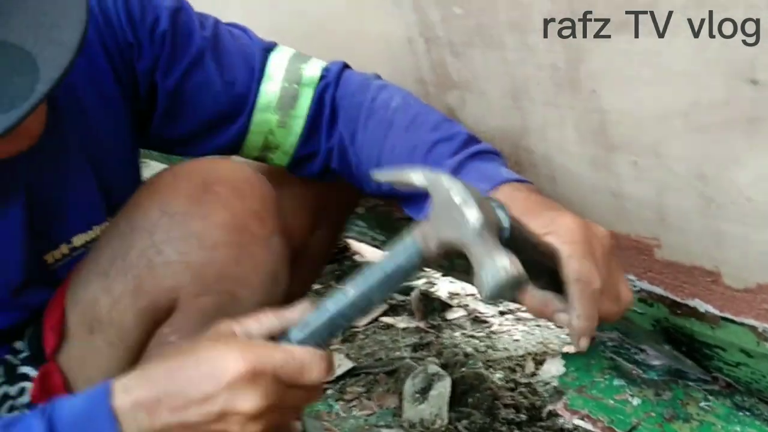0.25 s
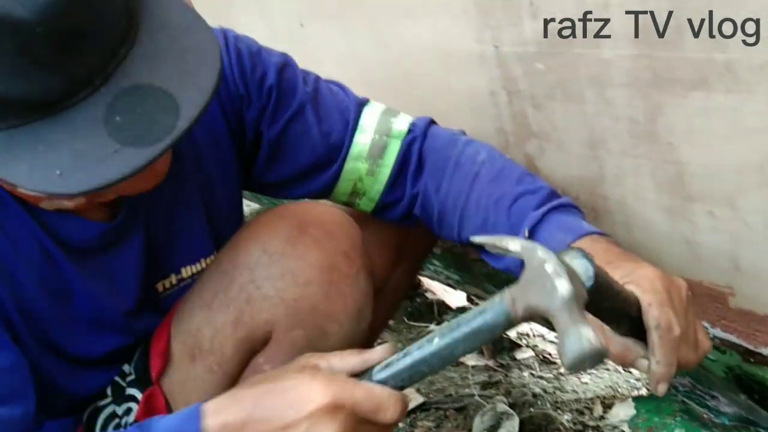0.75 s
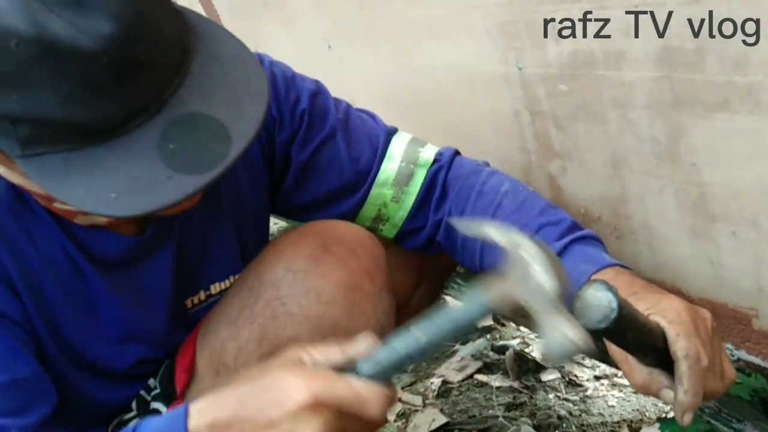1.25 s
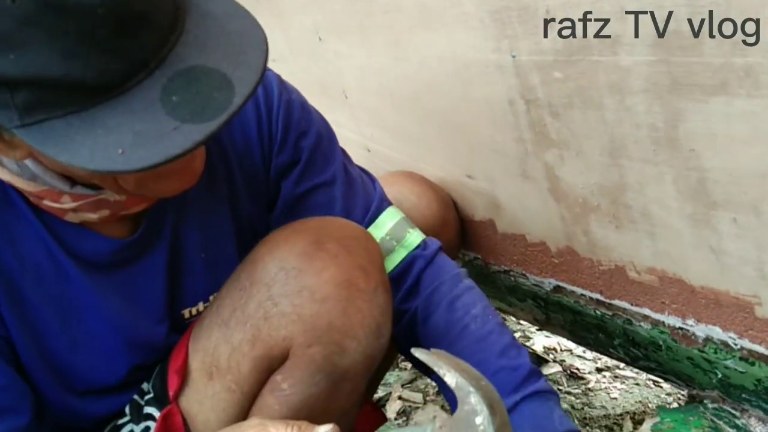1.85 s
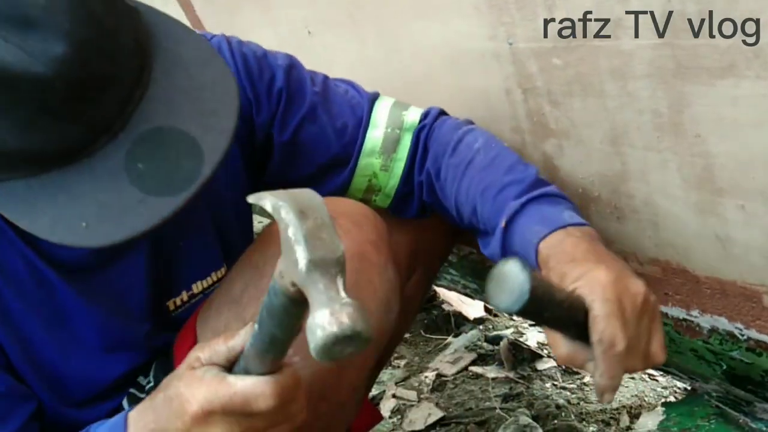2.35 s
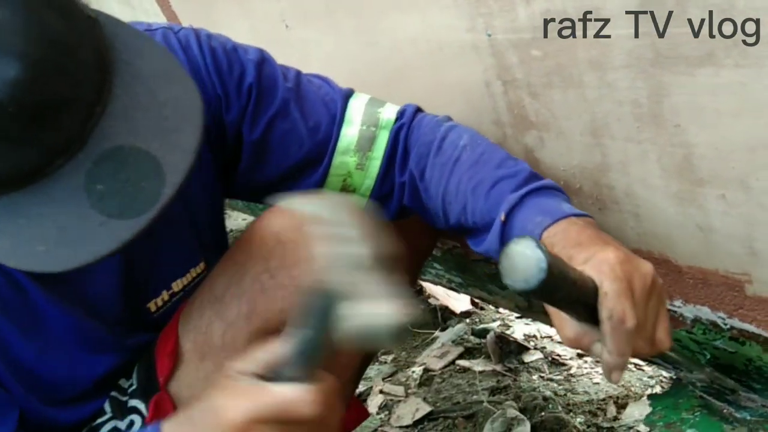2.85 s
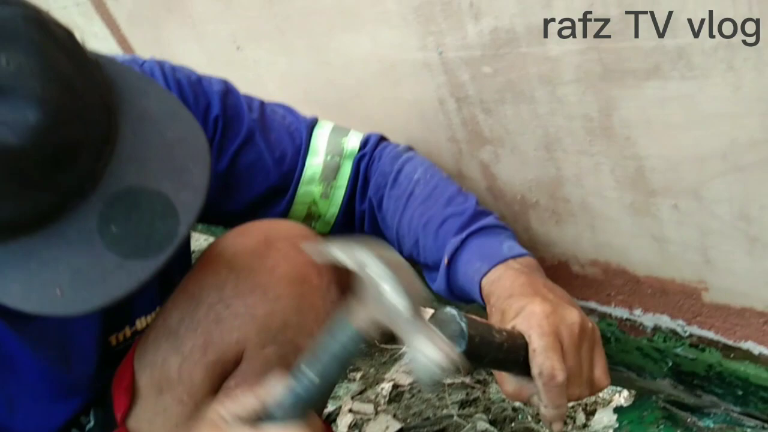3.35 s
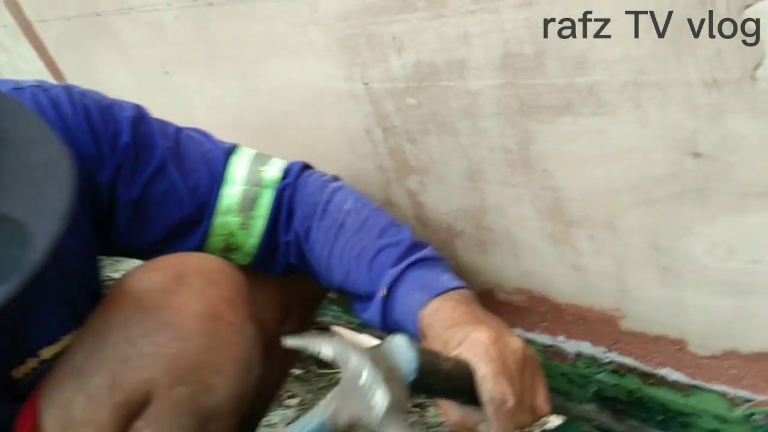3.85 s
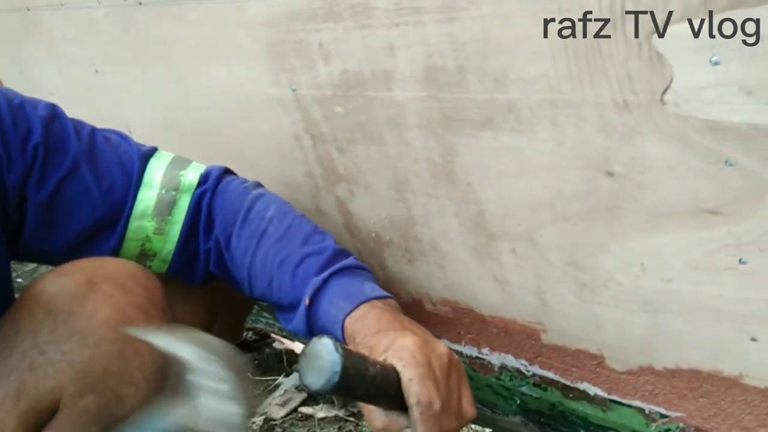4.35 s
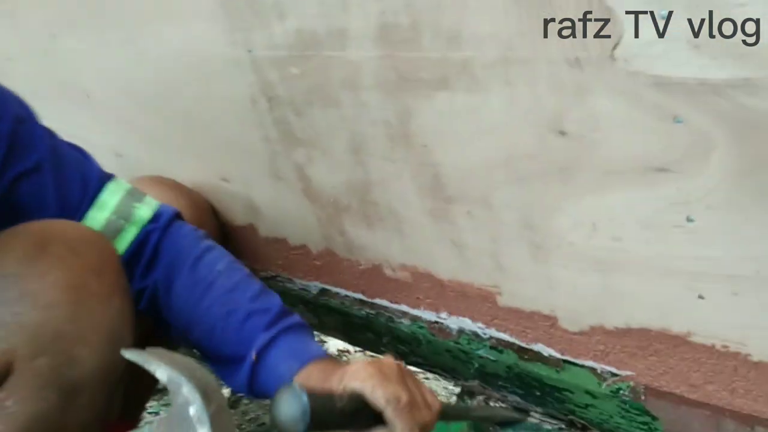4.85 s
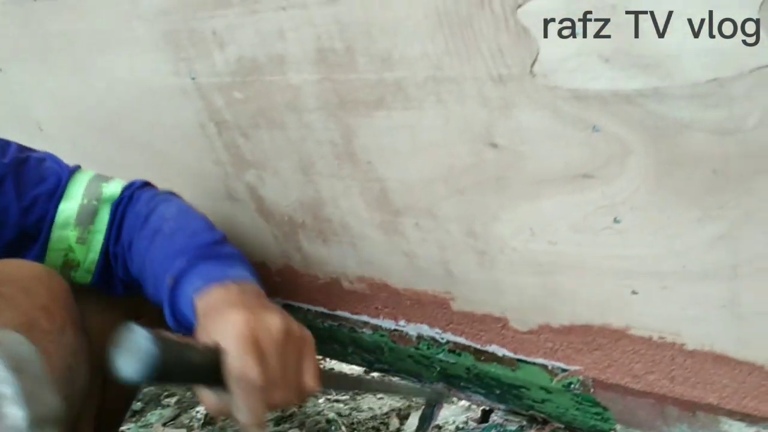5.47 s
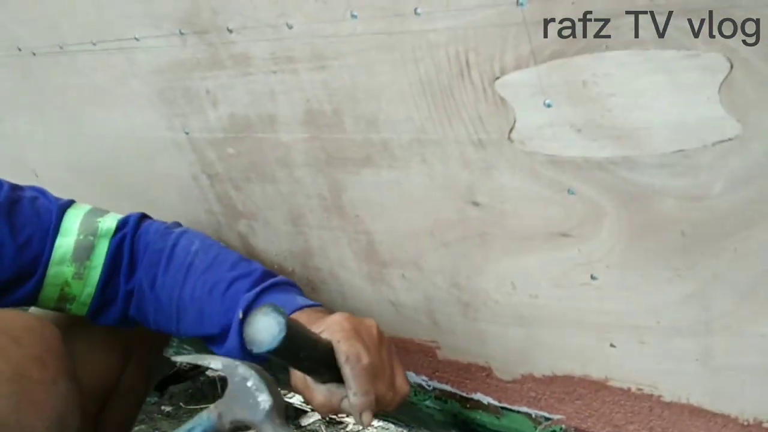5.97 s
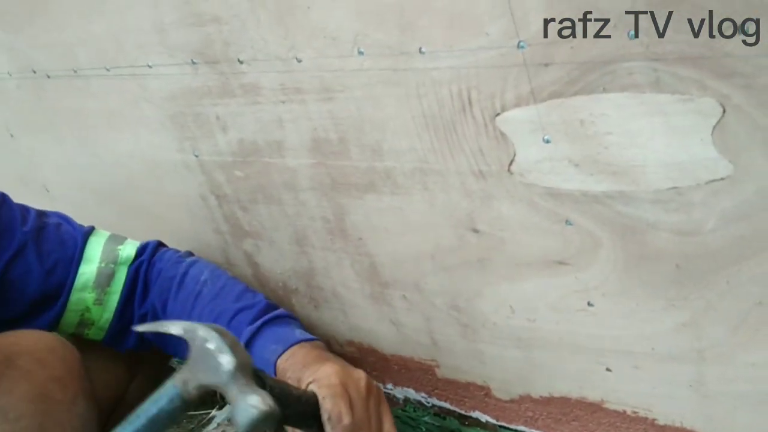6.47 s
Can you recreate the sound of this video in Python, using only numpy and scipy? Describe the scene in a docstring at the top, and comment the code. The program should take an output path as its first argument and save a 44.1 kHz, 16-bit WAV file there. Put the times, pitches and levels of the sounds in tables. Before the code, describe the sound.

A hammer taps a steel chisel up close while heavier blows boom on wooden planking farther off, over a faint outdoor hiss.

```python
"""An open yard near the surf, one microphone close to a wooden hull. A hammer drives a steel chisel
along a seam: dry bright taps, and small ticks where steel touches steel or grit. Heavier blows land on
the planking farther off: a murmur runs ahead through the wood, then crack and boom arrive by air.
In the distance a rooster ends its crow; a faint whine comes and goes over the hiss of surf and yard.
A limiter holds the peaks."""
import sys
import numpy as np
from scipy import signal
from scipy.io import wavfile
from scipy.ndimage import uniform_filter1d, minimum_filter1d

SR = 44100
rng = np.random.default_rng(int(sys.argv[2]) if len(sys.argv) > 2 else 0)


def store_pcm(level_fs):
    """Save levels as 16-bit WAV."""
    pcm = np.round(np.clip(level_fs, -1, 1) * 32767).astype(np.int16)
    wavfile.write(sys.argv[1], SR, np.atleast_2d(pcm).T)


N = 296117

# taps and rebounds: start_s, level_db, bass_db, middle_db, treble_db, length_factor, ring_db, flake_hz
TAPS = [(0.3393, 3, -3, -4.5, 6, 0.78, -8, 1386), (0.621, -5.5, -13, 1.5, -4, 2.54, -2, 2750),
        (1.1661, 0, 2.5, -2.5, 5.5, 0.85, -1, 1480), (1.193, -10.5, 3, -4, -9, 1.1, -3.5, 1560),
        (1.527, 5, -8.5, -4.5, -10, 0.93, -8.5, 2063), (2.985, -5, 9.5, -1, 3.5, 1.35, -8, 3620),
        (3.475, -6.5, 14.5, -2, 4.5, 0.96, -4, 1020), (3.8991, 0, 3.5, -4.3, 10.5, 1.06, -7, 2010),
        (4.2898, 3, 1, -3.5, 11.5, 0.77, -0.5, 1970), (4.684, -9, 11, 4.5, 11, 1.3, 6, 1473),
        (4.731, -10.5, -10, -7, -0.5, 1.1, 0, 4130), (6.003, -10, 11, -1.5, 4, 1.22, -4, 880),
        (6.034, -28.5, -5, -3, 3, 0.42, 3.5, 1040), (6.4593, -5.5, 7.5, 2.5, 3.5, 0.99, -1.5, 1413),
        (6.483, -21.5, 8, -6, -15, 0.54, 4.5, 2740)]
# spectrum of a tap: frequency_hz, density_db
TAP_SPECTRUM = [(35, -12), (60, -20), (497, -3.5), (938, 1), (1570, -4.5), (1850, 46), (2040, -14),
                (2290, -7), (3040, 4), (4630, -11), (5340, 2.5), (8140, -26), (15000, -48.5),
                (16500, -31.5)]
# decay of a tap at length factor 1: frequency_hz, t60_s
TAP_DECAY = [(100, 0.27), (400, 0.15), (1100, 0.097), (3000, 0.12), (7000, 0.11), (14000, 0.034)]
# modes of putty, seam and gripped chisel: pitch_hz, level_db, t60_s
SEAM_MODES = [(937, -1.5, 0.082), (1390, 9.5, 0.011), (2038, -8, 0.091), (3040, -6, 0.021),
              (3650, 9, 0.0048), (5850, 16.5, 0.0053)]
# modes of the short pitched note in a tap or tick: pitch_ratio, level_db, t60_s
SHORT_MODES = [(1.002, 13, 0.022), (1.43, -12, 0.0099)]


def chisel_taps(bands):
    """Close up, hammer on chisel: putty and wood crack while the seam and a struck flake ring."""
    hits, seam, flakes = [], [], []
    for start_s, level_db, bass_db, middle_db, treble_db, length, ring_db, flake_hz in TAPS:
        tail_db = -4
        hits.append((start_s, level_db - 11, bass_db, middle_db, treble_db, tail_db, length))
        mode_db = level_db + ring_db - 11.5
        seam.append((start_s, mode_db, 1))
        flakes.append((start_s, mode_db, flake_hz))
    cracks = impacts(bands, hits, TAP_SPECTRUM, TAP_DECAY, crack_s=0.0071, contact_s=0.00055,
                     rise_cycles=0.35, uneven_db=2.67, crunch_db=2.5,
                     echo_db=-35.5, echo_t60_s=0.3, duration_s=0.35)
    return (cracks + ring(seam, SEAM_MODES, spread_db=3.5, detune=0.015)
            + ring(flakes, SHORT_MODES, spread_db=3, detune=0.0056))


# light touches at the chisel: start_s, level_db, bass_db, tail_db, ring_db, clink_hz
TICKS = [(1.6283, -23, -7, -22, -6, 5630), (1.647, -14, -11, -18, -2, 5430),
         (1.6927, -17.5, -5, -10, -7, 6200), (1.7423, -37, -6, -21, 8, 5600),
         (1.7612, -12, -10, -13, 0, 5500), (3.2583, -17.5, 0, -15, -20, 2370),
         (3.269, -17.5, -18, -27, -23, 3220), (3.348, -25, -21, -17.5, -14, 3140),
         (4.8189, -35, 3, -15, -6, 1620), (4.9023, -33, -6, -12, -4, 5270), (4.9115, -21, -6, -24, 1, 5440),
         (4.933, -14, -4.5, -7, -9, 5360), (4.9607, -20.5, 2, -6, -1, 5350), (4.976, -17, 7, -20, 3, 5430),
         (4.9885, -27, 14, -8, -2, 5310), (5.0086, -18, 13, -11, 4, 5260), (5.0198, -14, 4, -7, -5, 5180),
         (5.0329, -14.5, 5, -9, -16, 5230), (5.043, -15, 19, -12, -8, 5200), (5.218, -39, -3, -2, 9, 6720),
         (5.24, -34.5, 22, -3.5, 1, 5370), (5.266, -31, 7, -0.5, -13, 1910),
         (5.3043, -26, 14, -1, -9, 5200), (5.4527, -36.5, -15, -17, -15, 5950),
         (5.7865, -24.5, 29, -6, -11, 970), (5.832, -34.5, 1, 2.5, 7, 6600),
         (5.871, -20.5, 8, -3.5, -20, 1330), (5.89, -22, 7, -16, -6, 5150)]
# spectrum of a tick: frequency_hz, density_db
TICK_SPECTRUM = [(180, -4.5), (300, -2.5), (1290, -0.5), (1740, -6.5), (2100, -5.5), (4610, -12),
                 (5360, -7), (7010, -7.5), (8430, -37.5), (14900, -32.5), (16500, -35)]
# decay of a tick at length factor 1: frequency_hz, t60_s
TICK_DECAY = [(500, 0.048), (5000, 0.1), (12000, 0.13)]
# modes of the loosely held chisel: pitch_hz, level_db, t60_s
STEEL_MODES = [(5270, -6, .06), (6850, -4, .08), (8590, -24, .14), (10450, -33, .14), (12600, -40, .1),
               (14200, -34, .1)]


def steel_ticks(bands, lifted_s=5.15):
    """Close up, light touches click and clink; the chisel is muted in the seam and rings once lifted."""
    hits, steel, clinks = [], [], []
    for start_s, level_db, bass_db, tail_db, ring_db, clink_hz in TICKS:
        middle_db, treble_db = 6.5 - 0.64 * bass_db, 4.5   # a duller touch has less middle
        length = 1.219 - 0.0371 * bass_db   # and a shorter tail
        hits.append((start_s, level_db - 11.5, bass_db, middle_db, treble_db, tail_db, length))
        hold_db = -8 if start_s > lifted_s else -18.5
        steel.append((start_s, level_db + ring_db + hold_db, 1))
        clinks.append((start_s, level_db - 19, clink_hz))   # mostly the steel chisel's own note
    clicks = impacts(bands, hits, TICK_SPECTRUM, TICK_DECAY, crack_s=0.0019, contact_s=0.00032,
                     rise_cycles=0.6, uneven_db=1.6, crunch_db=-1,
                     echo_db=-40, echo_t60_s=0.3, duration_s=0.15)
    return (clicks + ring(steel, STEEL_MODES, spread_db=3, detune=0.006)
            + ring(clinks, SHORT_MODES, spread_db=2.5, detune=0.02))


# blows on the planking: start_s, level_db, bass_db, bright_db, length_factor, knock_db, plank_hz, lead_s
BLOWS = [(0.043, -3, 4.7, -2, 0.95, -4, 209.6, 0.016), (0.23, -9, 3.5, 9, 0.77, 8.5, 157, 0.013),
         (0.248, -16.5, 1, 8.5, 0.45, 19.5, 170.8, 0.0061), (0.263, -16.5, 8.5, -1, 1.2, 13, 164, 0.0079),
         (0.546, -1, 2.5, -4, 1.42, 2, 217, 0.012), (0.754, -2.5, 1, 0, 0.42, -1.5, 306, 0.017),
         (0.768, -5.5, 0, -1, 0.86, 8, 162.5, 0.031), (1.003, -7.5, 0.5, 4.5, 1.08, 6.5, 164.5, .014),
         (1.272, -5.5, 7.2, 1.5, 1.17, 2.3, 311.4, 0.031), (1.388, -1, -15, 0.5, 1.03, -0.5, 159, 0.0076),
         (1.779, -5.5, -7.5, 5.5, 1.09, 2, 165.7, 0.012), (2.179, -6.5, -3.5, 6, 1.13, 5, 161.7, 0.013),
         (2.594, -7.5, 3.5, 5, 1.26, 11, 158.3, 0.014), (3.027, -14.5, 9.5, 11.5, 1.26, 14, 164, 0.0077),
         (3.771, -20.5, -14.5, -13, 2.4, 0.5, 137, 0.0058), (4.077, 0, -2.5, -4.5, 1.01, -4, 203, 0.011),
         (4.698, -9, 3.5, -4.5, 1.08, -5.5, 264, .015), (5.572, 4.5, -2.5, -5, 0.83, -8.5, 210.7, 0.012),
         (6.114, -2, 3.5, 0.9, 1.017, 0, 204.6, .012), (6.601, -0.5, 2.8, -0.5, 1.03, -1, 211, .014)]
# spectrum of a blow: frequency_hz, density_db
BLOW_SPECTRUM = [(24, -40), (40, -29), (81, -3), (258, 2), (324, -4.5), (438, -1), (865, -8.5), (1030, -5),
                 (1260, -11.5), (1710, -8), (5720, -8.5), (6820, -10), (8560, -40.5), (14900, -44.5),
                 (16500, -77)]
# decay of a blow at length factor 1: frequency_hz, t60_s
BLOW_DECAY = [(60, 0.57), (160, 0.34), (420, 0.3), (1100, 0.23), (3000, 0.16), (7000, 0.17), (14000, 0.11)]
# drum modes of a plank: pitch_ratio, level_db, t60_s
PLANK_MODES = [(.63, -13.5, 0.27), (1.002, 6, 0.066), (1.401, -3.5, 0.056), (1.848, -5.5, 0.08),
               (2.7, -14.5, 0.14), (3.601, -17, 0.26)]


def plank_blows(bands):
    """Farther along the hull, heavy blows crack and boom, and the plank rings like a drum."""
    hits, knocks = [], []
    for start_s, level_db, bass_db, bright_db, length, knock_db, plank_hz, _ in BLOWS:
        treble_db, tail_db = 0.99 * bright_db - 3, -3
        hits.append((start_s, level_db - 8, bass_db, bright_db, treble_db, tail_db, length))
        knocks.append((start_s, level_db + knock_db - 9.5, plank_hz))
    booms = impacts(bands, hits, BLOW_SPECTRUM, BLOW_DECAY, crack_s=0.0059, contact_s=0.0013,
                    rise_cycles=0.17, uneven_db=2.5, crunch_db=2,
                    echo_db=-31.5, echo_t60_s=0.86, duration_s=0.55)
    return booms + ring(knocks, PLANK_MODES, spread_db=2, detune=0.012)


def hull_murmur(bands, low_hz=460, high_hz=1060):
    """Sound is faster in wood than in air: a murmur reaches the microphone ahead of each far blow."""
    humps = np.exp(-np.log2(BAND_HZ / low_hz) ** 2) + np.exp(-np.log2(BAND_HZ / high_hz) ** 2)
    murmur = humps @ bands
    t, swell = np.arange(N) / SR, np.zeros(N)
    for start_s, level_db, *_, knock_db, _, lead_s in BLOWS:
        corners_s = start_s + lead_s * np.array([-1, -0.5, 0, 0.5])
        swell += amp(level_db + knock_db - 25.5) * np.interp(t, corners_s, [0, 0.65, 0.92, 0])
    return swell * murmur / murmur.std()


# the end of the crow: time_s, pitch_hz, level_db
CROW = [(0.091, 604, -70), (0.141, 622, -43.5), (0.299, 646, -40), (.42, 656, -45.5), (.49, 651, -39),
        (0.534, 630, -48), (0.561, 590, -62)]
# partials that reach the microphone: harmonic_number, level_db
CROW_PARTIALS = {2: 0, 4: -17, 7: -10, 8: -12, 9: -10}


def rooster(swell_db_per_hz=1):
    """A rooster far off: only a few partials carry, swelling as the pitch wavers up."""
    time_s, pitch_hz, level_db = np.transpose(CROW)
    t = np.arange(N) / SR
    waver_hz = 87 * uniform_filter1d(rng.standard_normal(N), size=800)
    phase = 2 * np.pi * np.cumsum(np.interp(t, time_s, pitch_hz) + waver_hz) / SR
    voice = sum(amp(db) * np.sin(harmonic * phase) for harmonic, db in CROW_PARTIALS.items())
    return amp(np.interp(t, time_s, level_db, right=-200) + waver_hz * swell_db_per_hz) * voice


def whine(pitch_hz=5500, level_db=-50, start_s=0.94, end_s=1.62, fade_s=0.042):
    """A faint steady whine, perhaps an insect: noise in one narrow resonance."""
    resonance = signal.butter(2, [pitch_hz - 40, pitch_hz + 40], "band", fs=SR, output="sos")
    tone = signal.sosfilt(resonance, rng.standard_normal(N))
    fade = np.interp(np.arange(N) / SR, [start_s, start_s + fade_s, end_s - fade_s, end_s], [0, 1, 1, 0])
    return amp(level_db) * fade ** 2 * tone / tone.std()


# drift of the distant hiss: time_s, level_db
HISS_LEVELS = [(0.0, -39.5), (0.75, -54), (1.08, -46), (1.4, -50), (2.7, -43), (3.61, -47), (4.22, -46),
               (4.37, -54), (4.73, -51.5), (4.97, -46.5), (5.42, -50), (5.94, -52), (6.71, -48)]
# spectrum of surf and yard: frequency_hz, density_db
YARD_SPECTRUM = [(15, -52), (25, 2), (74, 7.5), (124, 11.5), (288, -8), (339, 0.5), (378, -4), (600, -10.5),
                 (1060, -7.5), (4480, -13), (5870, -5), (8820, -46.5), (11300, -32.5), (15200, -70),
                 (16500, -27)]


def surf_and_yard(bands, rumble_db=-51):
    """Distant surf and yard noise: a smooth drifting hiss over a steady rumble."""
    time_s, level_db = np.transpose(HISS_LEVELS)
    gains = band_gains(YARD_SPECTRUM)
    low = BAND_HZ < 300
    hiss = gains[~low] @ bands[~low, ::-1]   # reversed noise is unrelated to the blows
    rumble = gains[low] @ bands[low, ::-1]
    return amp(np.interp(np.arange(N) / SR, time_s, level_db)) * hiss + amp(rumble_db) * rumble


EDGES_HZ = 28 * 2 ** np.arange(0, 9.4, 1 / 3)
BAND_HZ = np.sqrt(EDGES_HZ[1:] * EDGES_HZ[:-1])


def noise_bands():
    """Third-octave bands of white noise, neighbours unrelated."""
    settle = 8000   # samples for the filters to settle
    white = rng.standard_normal((2, N + settle))
    filters = [signal.butter(3, edges, "band", fs=SR, output="sos")
               for edges in zip(EDGES_HZ, EDGES_HZ[1:])]
    return np.array([signal.sosfilt(sos, white[k % 2])[settle:] for k, sos in enumerate(filters)])


def impacts(bands, hits, spectrum, decay, crack_s, contact_s, rise_cycles, uneven_db, crunch_db,
            echo_db, echo_t60_s, duration_s):
    """Each hit is a short crack, a lumpy tail dying band by band and a faint return from the yard."""
    out, t = np.zeros(N), np.arange(int(duration_s * SR)) / SR
    hz = BAND_HZ[:, None]
    bass = 1 / (1 + (hz / 725) ** 2)
    middle = np.exp(-np.log2(hz / 2800) ** 2 / 0.87)
    treble = 1 / (1 + (4070 / hz) ** 4)
    rise = 1 - np.exp(-t / (contact_s + rise_cycles / hz))   # lows take longer to build up
    echo = amp(echo_db + 3.7 * treble - 60 * t / echo_t60_s)
    scatter_db = uneven_db * rng.standard_normal((len(hits), len(hz), 1))
    lumps = smooth(rng.standard_normal(N + len(t)), 130)   # splinters and single echoes
    lumps = amp(crunch_db * lumps / lumps.std())
    for hit, own_db in zip(hits, scatter_db):
        start_s, level_db, bass_db, middle_db, treble_db, tail_db, length = hit
        span = slice(int(start_s * SR), int(start_s * SR) + len(t))
        tone_db = bass_db * bass + middle_db * middle + treble_db * treble + own_db
        crack = (1 - bass) * np.exp(-(t / crack_s) ** 2)
        tail = amp(tail_db * (1.5 - bass) - 60 * t / (length * at_hz(decay, hz)))
        tail *= bass + (1 - bass) * lumps[span]
        envelope = amp(level_db + tone_db) * rise * (crack + tail + echo)
        out[span] += band_gains(spectrum) @ (envelope[:, :N - span.start] * bands[:, span])
    return out


def ring(strikes, modes, spread_db, detune):
    """Each strike excites every mode with a strength, sign and slight detuning of its own."""
    mode_pitch, mode_db, t60_s = np.array(modes).T[:, :, None]
    out, t = np.zeros(N), np.arange(int(1.2 * t60_s.max() * SR)) / SR
    for start_s, level_db, pitch_scale in strikes:
        strength, sign, offset = rng.standard_normal((3, len(modes), 1))
        pitch_hz = mode_pitch * pitch_scale * (1 + detune * offset)
        swell = 1 - np.exp(-t * pitch_hz / 1.5)   # soft contact
        envelope = swell * amp(level_db + mode_db + spread_db * strength - 60 * t / t60_s)
        sines = envelope * np.sign(sign) * np.sin(2 * np.pi * pitch_hz * t)
        start = int(start_s * SR)
        out[start:start + len(t)] += sines.sum(axis=0)[:N - start]
    return out


def band_gains(spectrum):
    """Gains that give the summed bands this spectrum at an rms near 1."""
    gains = amp(at_hz(spectrum, BAND_HZ))
    return gains / np.sqrt(np.sum(gains ** 2 * np.diff(EDGES_HZ)) / (SR / 2))


def at_hz(curve, hz):
    """Read a curve on a log-frequency axis."""
    frequency_hz, values = np.transpose(curve)
    return np.interp(np.log(hz), np.log(frequency_hz), values)


def smooth(x, samples):
    """Two passes of a moving average."""
    return uniform_filter1d(uniform_filter1d(x, samples), samples)


def amp(db):
    """Decibels to gain."""
    return 10 ** (db / 20)


def scene():
    """The yard from one microphone position, near to far."""
    bands = noise_bands()
    near = chisel_taps(bands) + steel_ticks(bands)
    farther = plank_blows(bands) + hull_murmur(bands)
    background = rooster() + whine() + surf_and_yard(bands)
    return (near + farther + background)[None]


def record(dry, low_cut_hz=70, ceiling=0.82, stopband_hz=16600):
    """The microphone drops the deep bass, a fast limiter ducks the loudest attacks, the top is cut."""
    thin = signal.sosfilt(signal.butter(2, low_cut_hz, "high", fs=SR, output="sos"), dry)
    allowed_gain = np.minimum(1, ceiling / (np.abs(thin) + 1e-9))
    gain = smooth(minimum_filter1d(allowed_gain, size=61), 30)
    return signal.sosfilt(signal.cheby2(16, 80, stopband_hz, fs=SR, output="sos"), thin * gain)


dry = scene()
out = record(dry)
store_pcm(out)
```